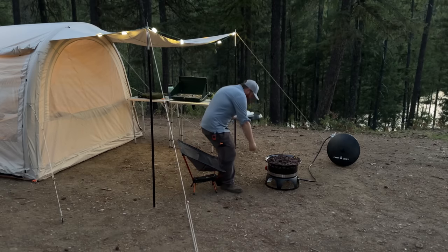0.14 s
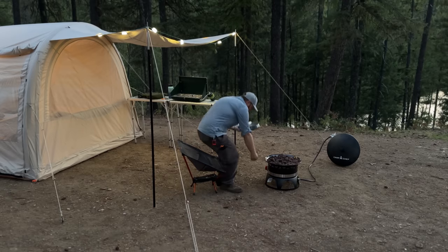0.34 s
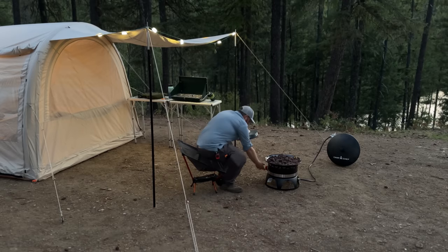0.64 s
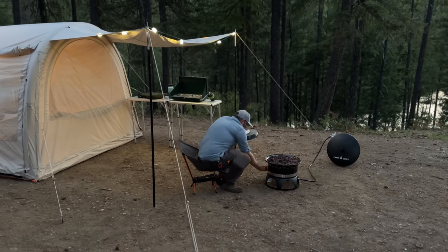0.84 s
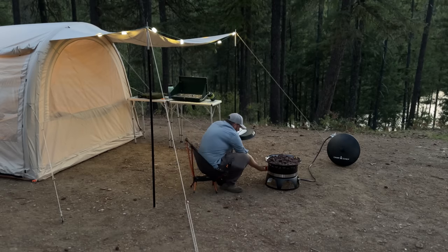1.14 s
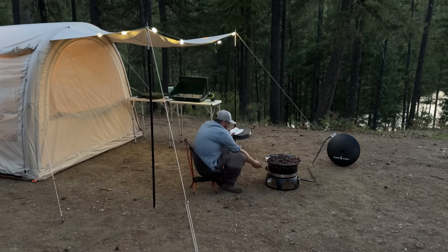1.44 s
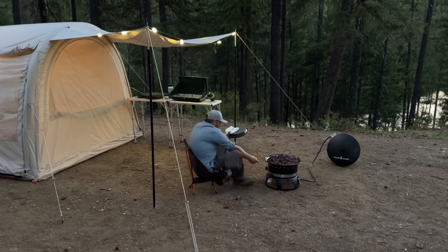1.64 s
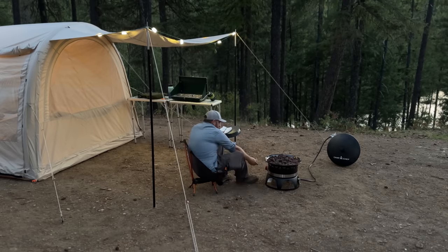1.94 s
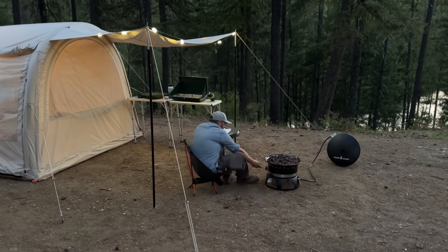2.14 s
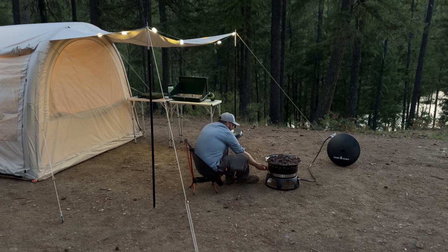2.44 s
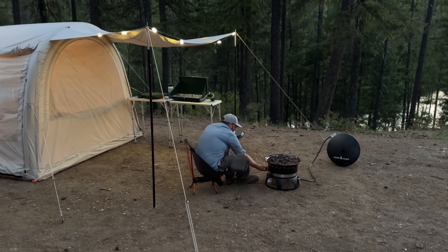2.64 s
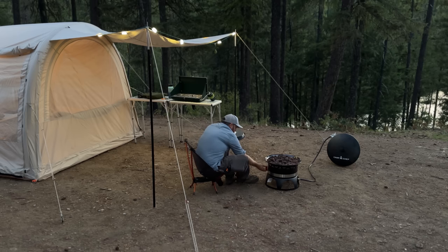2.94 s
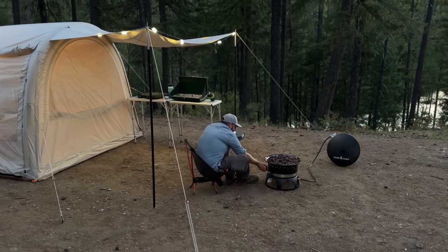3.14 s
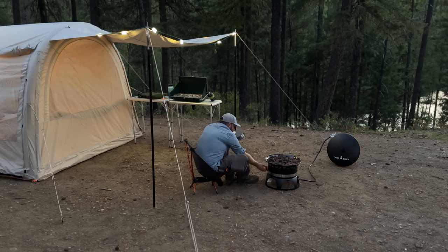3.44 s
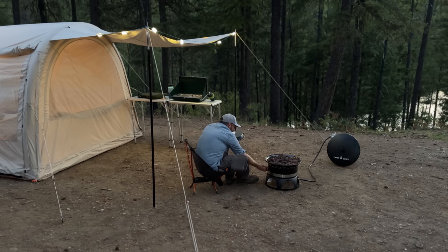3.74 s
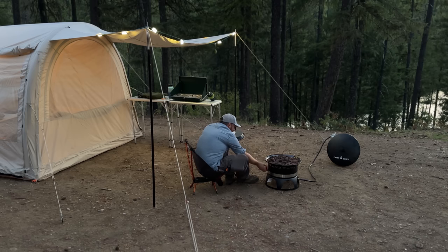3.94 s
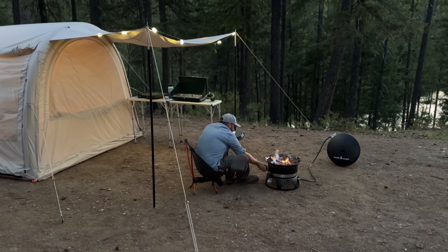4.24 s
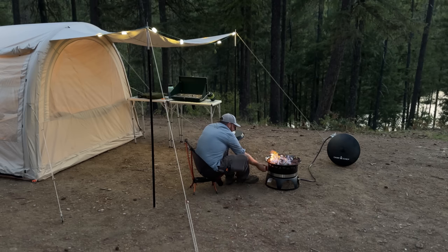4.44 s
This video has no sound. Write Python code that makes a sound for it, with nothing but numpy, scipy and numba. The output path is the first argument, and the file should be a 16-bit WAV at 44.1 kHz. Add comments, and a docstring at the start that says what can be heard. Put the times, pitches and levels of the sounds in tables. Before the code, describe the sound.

A quiet forest camp heard from several metres away through a stereo camera microphone. A steady, faint distant river, low soft wind rumble and a thin, flickering treble hiss run throughout. Very faint boot scuffs touch the soil around 0.1 to 0.3 seconds. A folding chair gives dry ticks at about 0.95, 1.1, 1.45 and 1.6, with a dull boot thud near 1.56. At 1.8 a knob clanks against ringing steel with a tiny bounce. Another soft scuff comes at 2.2, then chair slips from 2.47 run into a short, fading creak until 2.7. A very loud, sharp igniter snap cracks at 3.18, a smaller latch click follows at 3.59, and a second equally hard snap hits at 3.97. Gas catches with a soft, deep whump from about 4.1 to 4.22, then drops away quickly, leaving the quiet river and wind until 4.6. Blows leave short echoes from trunks; chair cracks also return duller from the tent wall.

```python
"""A gas fire bowl, some metres from a two-port camera microphone at a forest camp, is lit: the knob clanks,
the spring igniter snaps twice (noise cracks and ringing steel) and the gas catches with a soft whump of
band-passed noise. Boots scuff the soil as gated noise; a folding chair ticks and creaks in short cracks.
Trunks and a tent wall return short echoes over shaped noise: a distant river, a light wind, a thin hiss."""
import sys
import numpy as np
from scipy import signal
from scipy.fft import rfft, irfft
from scipy.io import wavfile
from scipy.ndimage import uniform_filter1d
from numba import njit

SR = 44100
rng = np.random.default_rng(int(sys.argv[2]) if len(sys.argv) > 2 else 0)


def store_wav(level_fs):
    """Save 16-bit WAV to argv[1]."""
    pcm = np.round(np.clip(np.atleast_2d(level_fs), -1, 1) * 32767)
    wavfile.write(sys.argv[1], SR, pcm.T.astype(np.int16))


N = 202371

# light wind, its rumble: (time [s], level [dB]) before the gusts; colour: (frequency [Hz], density [dB per Hz])
WIND_LEVEL = [(0, -68), (2.1, -69), (2.5, -72), (3.4, -74), (4.59, -68)]
WIND_COLOUR = [(25, -19), (50, 2), (110, -3), (200, -13), (400, -41.5)]
# distant river: (frequency [Hz], density [dB per Hz])
RIVER_COLOUR = [(20, -33), (40, -16), (60, -10.5), (150, -2.5), (250, -6.5), (400, -8), (700, -8),
                (1300, -7.5), (2000, -12.5), (3500, -15), (6500, -20.5), (8000, -33), (12000, -59.5)]
# thin treble hiss: (time [s], level [dB]) before its flicker; colour: (frequency [Hz], density [dB per Hz])
HISS_LEVEL = [(0, -100), (.17, -79.5), (.9, -80), (1.0, -72.5), (1.4, -79), (1.75, -74), (2.05, -71.5),
              (2.3, -83), (2.8, -105), (3.05, -92), (3.15, -75), (3.55, -84), (3.8, -100), (3.95, -77),
              (4.3, -90), (4.59, -86.5)]
HISS_COLOUR = [(5000, -28), (7500, -1), (10000, 0), (13000, -10), (15600, -3), (16000, -26)]
# echo from the trunks: (frequency [Hz], density [dB per Hz]); (frequency [Hz], 60 dB decay [s])
TREES_COLOUR = [(300, -2.5), (1500, -7), (5000, -6.5), (12000, -7.5), (16000, -8)]
TREES_T60 = [(500, 0.47), (2000, 0.33), (6000, 0.5), (14000, 0.26)]
# boots on soil: (start [s], length [s], thud level [dB], thud centre [Hz], grit level [dB])
SCUFFS = [(0.109, 0.048, -56, 333, -64), (0.299, 0.017, -61.5, 260, -65), (0.318, 0.029, -57.5, 313, -58),
          (1.325, 0.13, -66, 195, -72), (1.513, 0.019, -55, 343, -67), (1.538, 0.034, -62, 400, -58.5),
          (1.564, 0.041, -44, 275, -57), (1.615, 0.044, -55.5, 338, -62.5), (2.15, 0.021, -56, 176, -63.5),
          (2.201, 0.039, -46.5, 236, -62.5), (2.235, .037, -53.5, 394, -58)]
# sharp ticks: the first crackles within a boot scuff, the rest are single slips in a chair joint: (time [s],
# level [dB], treble tilt [dB per octave])
SLIPS = [(0.3225, -48, 1), (0.9549, -30, -2.5), (1.1006, -33, 0.5), (1.4503, -31.5, -0.5),
         (1.492, -35.5, -1), (1.6003, -40.5, -5), (1.7136, -54, 2.5), (2.4694, -40, 6), (2.487, -33.5, 1),
         (2.5184, -26.5, 1), (2.5419, -24, 2), (2.5605, -26, 2.5), (2.5734, -26, 3), (2.584, -27, 2),
         (2.7187, -34, 0.5)]
# crack of a slip: (frequency [Hz], density [dB per Hz]); (frequency [Hz], 60 dB decay [s])
SLIP_COLOUR = [(880, -15), (1500, -13.5), (3930, -8.5), (4520, -8), (5100, -3), (6890, -0.5), (7620, -6),
               (8680, 1), (14900, -15), (16500, -12.5)]
SLIP_T60 = [(2000, 0.024), (6000, 0.0086), (14000, 0.011)]
# chair tube modes: (frequency [Hz], level [dB], 60 dB decay [s])
TUBE_MODES = [(4450, -3, .03), (4570, -3, .03), (4700, -4, .03), (5650, -7, .02), (6340, -6, .11),
              (6670, -4, .06), (8720, -6, .025), (10700, -8, .02)]
# gas catching: (time [s], level [dB], centre [Hz])
FLAME_PUFFS = [(3.99, -54.5, 150), (4.03, -51.5, 150), (4.09, -38.5, 121), (4.15, -37.5, 158),
               (4.216, -36.5, 157), (4.245, -57, 115), (4.29, -60.5, 120), (4.44, -64.5, 130),
               (4.495, -56, 120), (4.589, -66, 115)]
# igniter hammer: (time [s], level [dB], treble tilt [dB per octave], bowl ring relative to the blow [dB])
SNAPS = [(2.0474, -50.5, -7.5, -24), (3.177, -9.5, 0.5, -25.5), (3.7133, -51, -4.5, -16.5),
         (3.9722, -9.5, 0.5, -27.5)]
# crack of the hammer: (frequency [Hz], density [dB per Hz]); (frequency [Hz], 60 dB decay [s])
SNAP_COLOUR = [(120, -35), (280, -20), (470, -12), (800, -22), (1300, -13), (1700, -3), (2300, -14),
               (3600, -14.5), (7300, -15), (8500, 0), (10000, -10), (12500, -15.5), (15800, -23.5),
               (16500, -43)]
SNAP_T60 = [(300, 0.081), (1700, 0.09), (4000, 0.12), (9000, .05), (15000, 0.045)]
# first contact of the hammer: (frequency [Hz], density [dB per Hz]); (frequency [Hz], 60 dB decay [s])
TICK_COLOUR = [(3000, -18), (7000, 2), (10000, -1), (15500, -10.5), (16500, -21.5)]
TICK_T60 = [(3000, 0.015), (16000, 0.018)]
# igniter housing modes: (frequency [Hz], level [dB], 60 dB decay [s])
HOUSING_MODES = [(300, -14, .06), (468, -13, .06), (1362, -9, .07), (1485, -8, .05), (1612, -2, .05),
                 (1700, -8, .05), (1812, 0, .045), (1956, -11, .05), (2052, -9, .05), (3455, -12, .06),
                 (3655, -9, .05), (11660, -25, .2), (11955, -16, .07)]
# igniter spring cocked or let back: same columns as the snaps
LATCHES = [(2.9012, -63.5, 0.0084, -26), (3.557, -55.5, 0.0033, -19), (3.5915, -22.5, 0.012, -33)]
# crack of the latch: (frequency [Hz], density [dB per Hz]); (frequency [Hz], 60 dB decay [s])
LATCH_COLOUR = [(470, -57), (800, -31), (1780, -7), (2320, -21), (5700, -4.5), (7150, -8), (14200, -0.5),
                (15900, -11), (16500, -40)]
LATCH_T60 = [(1500, 0.079), (6000, 0.057), (14000, 0.041)]
# knob pushed against the steel, with a bounce: same columns as the snaps
CLANKS = [(1.7965, -25, 0.4, 0), (1.8135, -36, -2.5, -2.5), (2.0215, -58.5, -4, -5.5)]
# crack of the knob: (frequency [Hz], density [dB per Hz]); (frequency [Hz], 60 dB decay [s])
CLANK_COLOUR = [(120, -50), (200, -27.5), (442, -2), (715, -26), (1020, -12), (1730, -11.5), (1870, -8),
                (2860, -11.5), (4790, 1), (13200, -3), (16500, -16)]
CLANK_T60 = [(400, 0.13), (2000, 0.44), (4500, 0.086), (9000, 0.096), (15000, 0.024)]
# steel bowl modes: (frequency [Hz], level [dB], 60 dB decay [s])
BOWL_MODES = [(440, -15, .12), (899, -19, .4), (1028, -8, .28), (1330, -10, .13), (1880, -11, .33),
              (2062, -9, .3), (2410, -3, .12), (2778, -11, .12), (3122, -17, .23), (3432, -8, .17),
              (3604, -5, .24), (3752, -9, .2), (3854, -3, .27), (4030, -6, .24), (4138, -5, .23),
              (4280, -11, .28), (4488, -8, .1), (4657, -8, .18), (4880, -7, .08), (6099, -17, .2),
              (7456, -12, .08), (11090, -24, .19)]
# how the two ports hear each direction:
# (frequency [Hz], left minus right [dB], left leads by [radians], share heard alike [0 to 1])
FROM_RIVER = [(60, 1.5, 1, 0.85), (179, 2.5, 0.7, 0.88), (486, 0.5, -3, 0.38), (800, -6.5, -2.5, 0.78),
              (1370, 0, -1.5, 0.39), (2070, 0.5, -0.5, .1), (5940, 6.5, 2, 0.051), (7950, 2, 1.5, 0.54)]
FROM_TREES = [(200, 0, -.2, .8), (700, -2, 0, .2), (1500, -2, -.3, .7), (5500, 2, .5, .3),
              (7800, 2, 2.2, .6), (12000, 0, 0, 1), (16000, 0, -2.2, .6)]
FROM_CHAIR = [(1500, 0, -.2, 1), (3300, 1, 1.5, .9), (6700, 1, 1.1, .9), (7800, 3, 2.5, .9),
              (12000, 0, 0, 1), (16000, 0, -2.2, .9)]
FROM_BOWL = [(200, 0, -.1, 1), (1600, -4, -.5, 1), (2900, 0, 0, 1), (4000, -1, 0, .8), (5200, -5, .3, .4),
             (6700, 1, 0, .4), (7600, 2, 2.3, .9), (8700, 2, 1.9, .9), (12000, 0, 0, 1),
             (16000, 0, -2.2, .8)]

RIVER_DB, TREES_DB = -60, -16
TENT_S, TENT_DB = 0.0086, -7.5  # delay and level of the tent wall echo
RISE_CYCLES = 1.35  # a panel needs a few cycles to start moving
SCUFF_RISE_SHARE, SCUFF_RELEASE_S, GRIT_LEAD_S = 0.4, 0.0084, 0.0093
TUBE_RING_DB = -11.5
# the creak: slip rate, timing scatter, level, fade, level scatter, treble tilt per octave and its dulling
CREAK_START_S, CREAK_END_S, CREAK_PER_S, CREAK_JITTER_S = 2.5926, 2.708, 115.5, 0.00041
CREAK_DB, CREAK_FADE_DB_PER_S, CREAK_SCATTER_DB = -28.5, -25, 0.4
CREAK_TILT_DB, CREAK_DULL_DB_PER_S = -0.1, -14
SWELL_DB, SWELL_LAG_S = -2, 0.015  # deep swell relative to and behind the puffs
ROAR_DB, ROAR_END_S, ROAR_FADE_S, ROAR_AFTER_DB = -57, 4.21, 0.0085, -80
LOW_CUT_HZ, TOP_HZ = 36, 16500


def undb(db):
    """dB to gain."""
    return 10 ** (np.asarray(db) / 20)


def column(table, hz, axis=1):
    """One column of a frequency table, read on a log-frequency axis."""
    table = np.array(table, float)
    return np.interp(np.log(hz + 1), np.log(table[:, 0]), table[:, axis])


def curve(rows):
    """Columns of a time table, sample by sample."""
    s, *columns = np.transpose(rows)
    return [np.interp(np.arange(N) / SR, s, values) for values in columns]


def walk(rate):
    """Random levels held for 1 / rate seconds and smoothed twice; spread 1."""
    hold = int(SR / rate)
    held = np.repeat(rng.standard_normal(N // hold + 1), hold)
    slewed = uniform_filter1d(uniform_filter1d(held, hold), hold)[:N]
    return slewed / slewed.std()


def noise(colour, size=N):
    """Spectrum of a noise with the given colour and rms 1, and its frequencies."""
    hz = np.arange(size // 2 + 1) * SR / size
    spectrum = rfft(rng.standard_normal(size)) * undb(column(colour, hz))
    return spectrum / irfft(spectrum, size).std(), hz


def burst(colour, t60, size=32768):
    """Noise that starts within a few cycles and dies at its own pace in each half octave."""
    spectrum, hz = noise(colour, size=size)
    t = np.arange(size) / SR
    out = 0
    for mid in 100 * 2 ** np.arange(0, 8, 0.5):
        share = np.clip(1 - 2 * np.abs(np.log2((hz + 1) / mid)), 0, 1)  # overlapping triangles
        rise = 1 - np.exp(-t * mid / RISE_CYCLES)
        decay = undb(-60 * t / column(t60, mid))
        out = out + irfft(spectrum * share, size) * rise * decay
    return out


def ring(modes, size=32768):
    """Struck metal: a sum of decaying sines, peak 1."""
    t = np.arange(size) / SR
    out = 0
    for hz, db, t60 in modes:
        rise = 1 - np.exp(-t * hz / RISE_CYCLES)
        out = out + rise * undb(db - 60 * t / t60) * np.sin(2 * np.pi * hz * t)
    return out / np.abs(out).max()


def add(track, s, sound, db, tilt_db=0):
    """Mix a sound in at time s; harder contact tilts it towards the treble, about 4 kHz."""
    size = len(sound)
    hz = np.arange(size // 2 + 1) * SR / size
    tilt = undb(tilt_db * np.log2(np.clip(hz, 500, 16000) / 4000))
    tilted = irfft(rfft(sound) * tilt, size)
    faded = tilted * np.linspace(1, 0, size)  # no click at the end
    start = int(s * SR)
    track[start:start + size] += undb(db) * faded[:N - start]


@njit
def svf(x, hz, sharp):
    """State-variable band-pass whose centre moves."""
    y, band, low = np.empty(len(x)), 0., 0.
    for i in range(len(x)):
        g = np.tan(np.pi * hz[i] / SR)
        v = (band + g * (x[i] - low)) / (1 + g * (g + 1 / sharp))
        band, low, y[i] = 2 * v - band, low + 2 * g * v, v / sharp
    return y


def steep(x, hz, sharp):
    """The band-pass twice, for dark skirts."""
    hz = hz + np.zeros(N)
    return svf(svf(x, hz, sharp), hz, sharp)


def steady(x, hold_s):
    """Level evened out to rms 1 over every hold_s seconds."""
    return x / np.sqrt(uniform_filter1d(x ** 2, int(hold_s * SR)) + 1e-12)


def ports(x, other, way):
    """Two ports: direction splits level and phase; what is not heard alike comes from the other signal."""
    hz = np.arange(N // 2 + 1) * SR / N
    way = np.array(way)
    db, lead, alike = (np.interp(hz, way[:, 0], way[:, k]) for k in (1, 2, 3))
    alike = np.clip(alike, 0, 1)
    side = np.array([[1], [-1]])  # left, right
    common = np.sqrt((1 + alike) / 2) * rfft(x)
    apart = side * np.sqrt((1 - alike) / 2) * rfft(other)
    return irfft((common + apart) * undb(side * db / 2) * np.exp(side * 0.5j * lead), N)


def wind():
    """Light wind rumbles in the tent: deep noise whose level wanders in gusts."""
    return undb(curve(WIND_LEVEL)[0] + 4.0 * walk(8)) * irfft(noise(WIND_COLOUR)[0], N)


def river():
    """Distant water: two independent noises spread over the ports, with a slight level drift."""
    wash = ports(irfft(noise(RIVER_COLOUR)[0], N), irfft(noise(RIVER_COLOUR)[0], N), FROM_RIVER)
    return undb(RIVER_DB + 0.15 * walk(4.5)) * wash


def tree_echo(x):
    """Trunks scatter the blows and slips into a decaying tail, drawn twice to spread over the ports."""
    tails = [burst(TREES_COLOUR, TREES_T60) for _ in range(2)]
    echoes = [signal.fftconvolve(x, tail / np.linalg.norm(tail))[:N] for tail in tails]
    return undb(TREES_DB) * ports(*echoes, FROM_TREES)


def treble_hiss():
    """Thin treble noise that flickers; two noises share one level."""
    level = undb(curve(HISS_LEVEL)[0] + 1.7 * walk(130))
    return [level * irfft(noise(HISS_COLOUR)[0], N) for _ in range(2)]


def press(t, length):
    """The weight comes on, stays and lets go."""
    rise = np.clip(t / (SCUFF_RISE_SHARE * length), 0, 1) ** 2
    return rise * np.exp(-np.clip(t - length, 0, None) / SCUFF_RELEASE_S)


def boots():
    """A dull thud on soil; the grit on top crunches just ahead of it."""
    t = np.arange(N) / SR
    out = 0
    crunch = rng.standard_normal(N) * undb(5 * walk(400))
    grit = steady(steep(crunch, 1500, 0.8), 0.04)
    ground = steady(steep(rng.standard_normal(N), 131, 0.92), 0.075)  # the weight booms in the soil
    for s, length, db, hz, grit_db in SCUFFS:
        thud = steady(steep(rng.standard_normal(N), hz, 0.72), 0.018) + undb(-9.0) * ground
        out = out + undb(db) * press(t - s, length) * thud
        out = out + undb(grit_db) * press(t - s + GRIT_LEAD_S, length) * grit
    return out


def creak():
    """Under full weight the slips run together, each a little early or late, fading and dulling."""
    s = np.arange(CREAK_START_S, CREAK_END_S, 1 / CREAK_PER_S)
    chance = rng.standard_normal((32, 2))[:len(s)]
    age = s - CREAK_START_S
    db = CREAK_DB + CREAK_FADE_DB_PER_S * age + CREAK_SCATTER_DB * chance[:, 0]
    tilt_db = CREAK_TILT_DB + CREAK_DULL_DB_PER_S * age
    return list(zip(s + CREAK_JITTER_S * chance[:, 1], db, tilt_db))


def chair():
    """Each slip is a fresh crack that pings the tube; the tent wall sends it back duller."""
    out = np.zeros(N)
    ping = undb(TUBE_RING_DB) * ring(TUBE_MODES, size=8192)
    for s, db, tilt_db in SLIPS + creak():
        crack = 0.49 * burst(SLIP_COLOUR, SLIP_T60, size=8192)
        add(out, s, crack + ping, db, tilt_db)
    tent = np.roll(steep(out, 4800, 0.38), int(TENT_S * SR))
    return out + undb(TENT_DB) * tent


def flame():
    """Gas pockets burn in slow puffs; a deep swell lags; a faint roar flutters while the flame spreads."""
    t = np.arange(N) / SR
    db, hz = curve(FLAME_PUFFS)
    puffs = steady(steep(rng.standard_normal(N), hz, 1.4), 0.029)
    deep = steady(steep(rng.standard_normal(N), 60, 1.9), 0.027)
    roar = steady(steep(rng.standard_normal(N), 520, 0.46), 0.12) * undb(1.0 * walk(90))
    roar_fade = np.exp(-np.clip(t - ROAR_END_S, 0, None) / ROAR_FADE_S)
    roar = roar * (undb(ROAR_DB) * roar_fade + undb(ROAR_AFTER_DB))
    swell = undb(SWELL_DB + np.interp(t - SWELL_LAG_S, t, db))
    lit = t > FLAME_PUFFS[0][0]
    return lit * (undb(db) * puffs + swell * deep + roar)


def fire_bowl():
    """Every blow cracks in its own colour and sets the steel bowl ringing."""
    out = np.zeros(N)
    bowl = ring(BOWL_MODES)
    snap = 0.35 * burst(SNAP_COLOUR, SNAP_T60) + 0.45 * ring(HOUSING_MODES)
    snap = snap + 0.51 * burst(TICK_COLOUR, TICK_T60)
    latch = 0.42 * burst(LATCH_COLOUR, LATCH_T60)
    clank = 0.89 * burst(CLANK_COLOUR, CLANK_T60)
    for events, crack in ((SNAPS, snap), (LATCHES, latch), (CLANKS, clank)):
        for s, db, tilt_db, ring_db in events:
            add(out, s, crack, db, tilt_db)
            add(out, s, bowl, db + ring_db)
    return out


def scene():
    """Bowl and chair with their tree echo, then boots, flame, hiss, wind and river, at the two ports."""
    bowl, slips = fire_bowl(), chair()
    trees = tree_echo(bowl + slips)
    smear = burst(TREES_COLOUR, [(500, 0.0014), (16000, 0.0013)], size=1024)  # scattering about the camera body
    smear = smear / np.linalg.norm(smear)
    bowl_side, slips_side = (signal.fftconvolve(x, smear)[:N] for x in (bowl, slips))
    hiss, hiss_side = treble_hiss()
    near = ports(bowl + hiss, bowl_side + hiss_side, FROM_BOWL) + ports(slips, slips_side, FROM_CHAIR)
    return near + trees + boots() + flame() + wind() + river()


def record(dry):
    """The recorder rolls off the deepest bass and cuts the top."""
    low_cut = signal.butter(2, LOW_CUT_HZ, "high", fs=SR, output="sos")
    top_cut = signal.ellip(10, 0.2, 80, TOP_HZ, fs=SR, output="sos")  # ripple and stop band in dB
    return signal.sosfilt(top_cut, signal.sosfilt(low_cut, dry))


dry = scene()
out = record(dry)
store_wav(out)
```